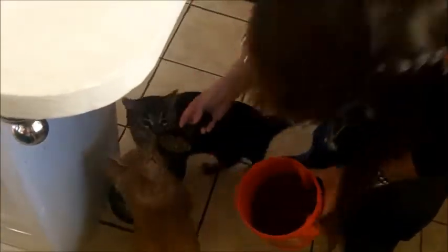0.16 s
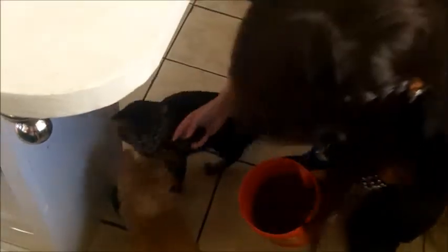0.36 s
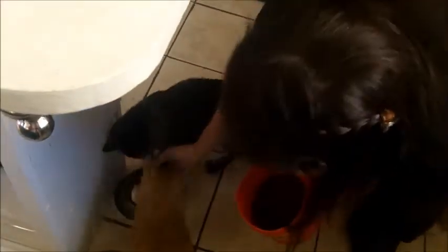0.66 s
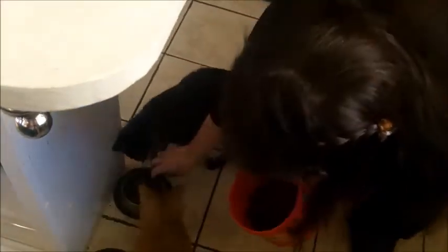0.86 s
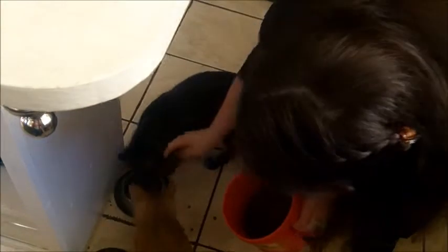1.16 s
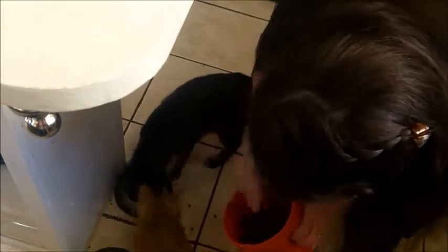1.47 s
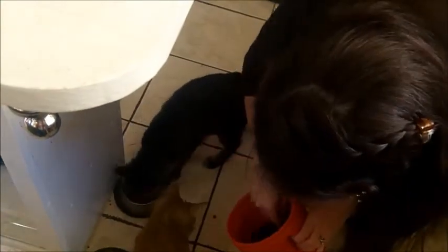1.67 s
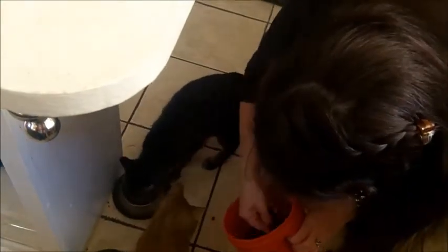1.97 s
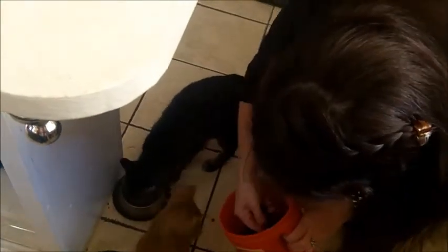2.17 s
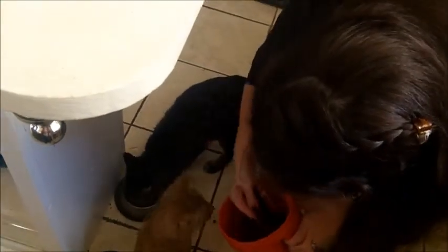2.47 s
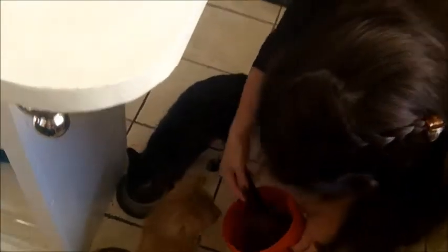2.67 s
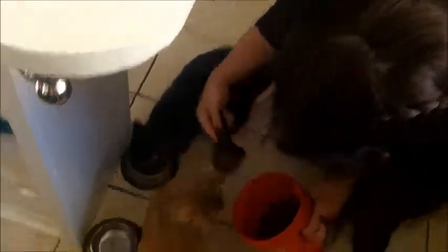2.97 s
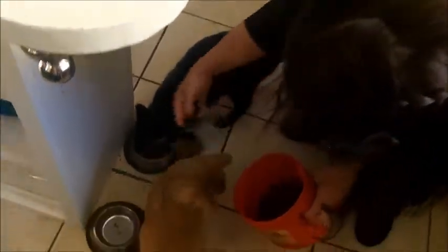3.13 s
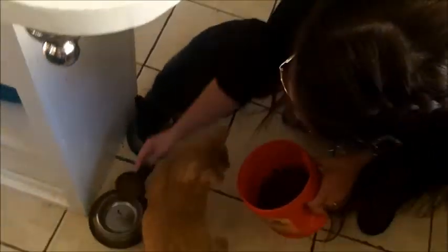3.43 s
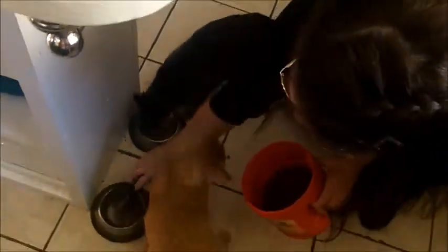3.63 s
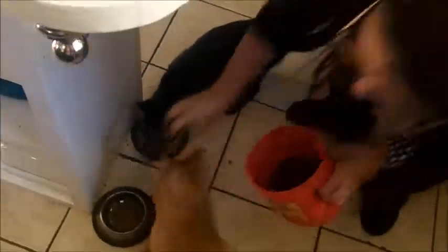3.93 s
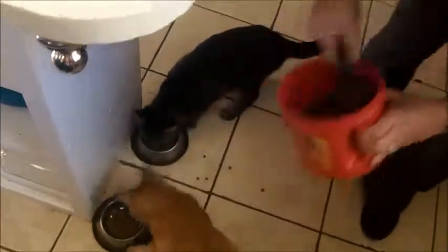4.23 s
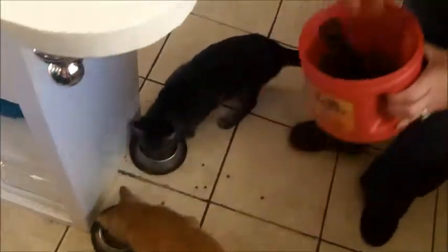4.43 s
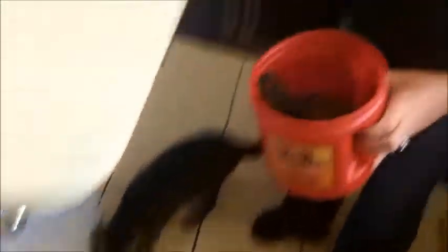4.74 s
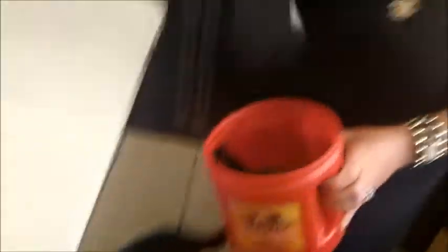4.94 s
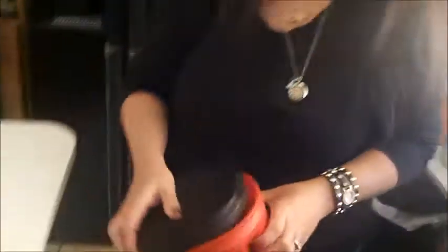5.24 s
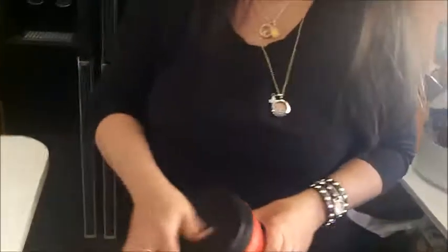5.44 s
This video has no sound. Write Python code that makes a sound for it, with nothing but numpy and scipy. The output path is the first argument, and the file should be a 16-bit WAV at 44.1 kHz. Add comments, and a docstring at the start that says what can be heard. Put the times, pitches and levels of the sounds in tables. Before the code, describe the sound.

Dry cat food clatters into a steel bowl, a plastic scoop digs in a tub, a second bowl is filled, then a lid snaps shut.

```python
"""Dry cat food rattles into a steel bowl, a scoop digs in a plastic tub, and a second scoopful fills another bowl.
The scoop is dropped into the tub, the food slides as the tub is lifted, and the lid snaps on, over a quiet rumble.
Random pellet impacts ring the modes of the bowls and the tub; filtered bursts of noise make the plastic cracks.
Echoes of decaying noise place it all in a tiled kitchen."""
import sys
import numpy as np
from scipy import signal
from scipy.fft import rfft, irfft
from scipy.io import wavfile

SR = 44100
rng = np.random.default_rng(int(sys.argv[2]) if len(sys.argv) > 2 else 0)


def waveform_to_disk(signal):
    """Save audio, clipped to [-1, 1], as 16-bit WAV at the path in sys.argv[1]."""
    frames = np.transpose(np.atleast_2d(signal))
    scaled = np.clip(frames, -1, 1) * 32767
    samples = np.round(scaled).astype(np.int16)
    wavfile.write(sys.argv[1], SR, samples)


N = 246959
TIME = np.arange(N) / SR

# colour of food pellets crunching together: (frequency [Hz], relative level [dB])
CRUNCH_COLOUR = [(150, -46.5), (400, -4.5), (800, -1), (1400, 3.5), (2000, 3), (2700, 5.5), (3800, -0.5),
                 (5200, -6), (7000, -12.5), (7900, -107), (9700, -24), (14000, -93)]
# modes of the plastic tub: (frequency [Hz], relative level [dB], undamped time to fall 60 dB [s])
TUB_MODES = [(258, -35, 0.15), (419, 11.5, 0.028), (471, 24, 0.021), (587, 20, 0.024), (774, 2.5, 0.29),
             (1030, -47, 0.027), (1371, 10, 0.04)]
# modes of the plastic lid: (frequency [Hz], relative level [dB], time to fall 60 dB [s])
LID_MODES = [(225, -27, .05), (430, 14, 0.023), (580, -34, .06), (750, 13, 0.014), (920, -1, 0.032),
             (1140, 1, 0.028), (1950, -2, 0.013), (2900, 5.5, 0.037)]


def undb(db):
    """Turn decibels into a gain."""
    return 10 ** (np.asarray(db) / 20)


def unit(x):
    """Scale a sound to an energy of one."""
    return x / np.sqrt(np.sum(x ** 2) + 1e-18)


def fade(t60, size=6000):
    """Die away exponentially, by 60 dB in t60 seconds."""
    return np.exp(-np.log(1000) * TIME[:size] / max(t60, 1e-4))


def mode(hz, t60, size=6000):
    """One way an object can vibrate: a single decaying sine."""
    return np.sin(2 * np.pi * hz * TIME[:size]) * fade(t60, size)


def through(x, response):
    """Pass a sound through an impulse response."""
    return signal.fftconvolve(x, response)[:len(x)]


def high_pass(x, hz, order=2):
    """Remove the bass, since small objects radiate little of it."""
    return signal.sosfilt(signal.butter(order, hz, "high", fs=SR, output="sos"), x)


def low_pass(x, hz, order=4):
    """Remove the treble, since a soft contact gives little of it."""
    return signal.sosfilt(signal.butter(order, hz, fs=SR, output="sos"), x)


def colour(points, size=4096):
    """Make an impulse response of unit energy, with no pre-echo, from (frequency [Hz], level [dB]) points."""
    hz, db = np.transpose(points)
    bins = np.maximum(np.fft.rfftfreq(size, 1 / SR), 1)
    log_gain = np.log(undb(np.interp(np.log(bins), np.log(hz), db)))
    # folding the cepstrum gives minimum phase: the energy comes as early as it can
    cepstrum = irfft(log_gain)
    cepstrum[1:size // 2] *= 2
    cepstrum[size // 2 + 1:] = 0
    return unit(irfft(np.exp(rfft(cepstrum))))


def add(track, s, sound, db):
    """Place a hit on the track at s seconds with the given peak level."""
    start = int(s * SR)
    scaled = sound * undb(db) / np.abs(sound).max()
    track[start:start + len(sound)] += scaled[:N - start]


def wander(per_s):
    """Drift at random between per_s new values a second, with a spread near one."""
    knots = np.arange(0, TIME[-1] + 1, 1 / per_s)
    return np.interp(TIME, knots, rng.standard_normal(len(knots)))


def surges(rows, attack_s, fall_db_per_s):
    """Pellets get going, keep moving, then settle: one gain curve per level column, overlaps adding in power."""
    power = 0
    for s, hold, *levels in rows:
        age = TIME - s
        rise = np.clip(age / attack_s, 0, 1)
        fall = undb(-fall_db_per_s * np.clip(age - hold, 0, 1))
        power = power + np.outer(undb(levels), rise * fall) ** 2
    return np.sqrt(power)


def impacts(per_s, spread_db):
    """Pellets hit at random moments with uneven force; the mean power is one."""
    force = undb(spread_db * np.minimum(rng.standard_normal(N), 2))
    happens = rng.random(N) < per_s / SR
    return unit(force * happens) * np.sqrt(N)


def strike(hits, response):
    """Each impact lands somewhere else, so it excites a resonance with its own strength and sign."""
    return through(hits * rng.uniform(-0.97, 1, N) * np.sqrt(3), response)


def rattle(hits, spectrum, t60, count=18):
    """Every pellet clicks with its own mix of very short rings; the colour shifts as the heap rearranges."""
    clicks = 0
    for hz in np.geomspace(400, 13000, count):
        shifting = hits * undb(3.5 * wander(45))
        ring = unit(mode(hz, t60 * np.sqrt(1000 / hz)))  # t60 holds at 1 kHz, higher rings are shorter
        clicks = clicks + np.sqrt(hz) * strike(shifting, ring)
    return unit(through(clicks, colour(spectrum))) * np.sqrt(N)


def crack(hz, t60, low_db, high_db):
    """A burst of tiny slips: decaying noise shaped around one pitch, with little treble far above it."""
    skirt = [(100, low_db - 25.5), (hz / 2, low_db), (hz, 0), (hz * 1.5, -6)]
    treble = [(max(6500, hz * 1.6), high_db), (8000, -60), (15000, -52)]
    envelope = fade(t60)
    return through(rng.standard_normal(len(envelope)) * envelope, colour(skirt + treble))


def ringing(modes, damping=1):
    """One tap on a plastic body sets all its modes ringing; damping shortens them."""
    tap = sum(undb(db) * mode(hz, t60 / damping) for hz, db, t60 in modes)
    return low_pass(high_pass(tap, 152), 3000)


def pour(gushes, bowl, per_s, spread_db, fill_s, damping, detune, steel_db, bare_db, bright_db, clatter_db):
    """Pellets hit the steel and each other; as food covers the bottom the modes shift and ring softer and shorter."""
    # colour of pellets clattering: (frequency [Hz], relative level [dB])
    clatter_colour = [(150, -39), (400, 0), (800, 0.5), (1600, 3.5), (2800, 10), (4200, 1.5), (6800, -4),
                      (8000, -10), (12500, -33), (14000, -55)]
    attack_s, bright_hz = 0.0036, 3930
    flow, = surges(gushes, attack_s, fall_db_per_s=165)
    start = gushes[0][0]
    hits = impacts(per_s, spread_db)
    hits[int((start + attack_s) * SR)] = 2 * np.sqrt(SR / per_s)  # the front of the scoopful lands together

    bare = np.exp(-np.maximum(TIME - start, 0) / fill_s)  # share of the impacts that meet bare steel
    loudness = undb(bare_db * bare)
    sizes = unit(undb([level for _, level, _ in bowl]))
    steel = 0
    for size, (hz, _, t60) in zip(sizes, bowl):
        drive = hits * flow * loudness * undb(2 * wander(24.43))  # the stream moves over the nodes of this mode
        clear = strike(drive * np.sqrt(bare), unit(mode(hz, t60)))
        covered_mode = unit(mode(hz * (1 + detune), t60 / damping))
        muffled = strike(drive * np.sqrt((1 - bare) / damping), covered_mode)
        # hard pellets favour the high modes: bright_db is in dB per octave
        hardness = undb(bright_db * max(np.log2(hz / bright_hz), 0))
        steel = steel + size * hardness * (clear + muffled)
    clatter = flow * rattle(hits, clatter_colour, 0.0056)
    return undb(steel_db) * high_pass(steel, 400) + undb(clatter_db) * clatter


def fill_two_bowls():
    """Two scoopfuls ring two steel bowls, each with its own modes and its own speed of being covered."""
    # modes of each bare bowl: (frequency [Hz], relative level [dB], time to fall 60 dB [s])
    first_bowl = [(501, -16, .08), (770, -12, .07), (1040, -3, .1), (1500, -7, .07), (1597, -6, .08),
                  (1826, 0, .16), (1965, -6, .1), (2200, -5, .1), (2595, 0, .1), (2905, 0, .09),
                  (3080, -5, .08), (3920, -10, .05), (4080, -3, .07), (5116, -8, .16), (5245, -14, .1),
                  (6390, -12, .1), (6590, -12, .1), (9450, -19, .03), (10290, -25, .07), (11350, -21, .03),
                  (12650, -21, .02)]
    second_bowl = [(518, -5, .08), (615, -7, .1), (1443, 0.5, .13), (2103, -3, .14), (2414, -6, .09),
                   (2768, 0, .12), (3230, -5, .11), (4090, -1, .1), (5367, -13, .09), (5516, -9, .12),
                   (6835, -9, .09), (8280, -23, .06), (9735, -21, .05), (10040, -22, .09),
                   (11300, -19, .05), (12700, -25, .03)]
    # gushes of pellets leaving the scoop, one list per bowl: (time [s], time from start to fall [s], relative level [dB])
    first_gushes, second_gushes = [
        [(0.793, 0.24, -25.5), (0.82, 0.012, -22), (0.98, 0.02, -27)],
        [(3.657, 0.0053, -24), (3.691, 0.016, -21.5), (3.755, 0.074, -22.5)],
    ]
    first = pour(first_gushes, first_bowl, per_s=2200, spread_db=3.0, fill_s=0.11, damping=3.1,
                 detune=0.0058, steel_db=1.44, bare_db=2.5, bright_db=1, clatter_db=-4.5)
    second = pour(second_gushes, second_bowl, per_s=2200, spread_db=2.5, fill_s=0.055, damping=4.6,
                  detune=0.012, steel_db=0.36, bare_db=11.0, bright_db=0.5, clatter_db=-7.5)
    return first + second


def pings():
    """A lone late pellet rings one low mode of the first steel bowl."""
    # late pellets: (time [s], peak level [dB])
    late_pellets = [(1.125, -28), (1.254, -36)]
    out = np.zeros(N)
    for s, db in late_pellets:
        add(out, s, mode(1026, t60=0.038), db)
    return out


def stir(per_s, spread_db, crunch_db, boom_db):
    """Pellets grind past each other and drum on the tub; once the lid is on, the lid rings instead."""
    # pushes that set the food moving:
    # (time [s], time from start to fall [s], relative crunch level [dB], relative boom level of the wall [dB])
    pushes = [(1.585, 0.028, -26.5, -57), (1.672, 0.37, -29.5, -31), (1.716, 0.011, -21.5, -35),
              (1.762, 0.0083, -26.5, -38), (1.872, 0.029, -37, -34), (2.06, 0.028, -27.5, -32),
              (2.08, 0.028, -22.5, -30.5), (2.2, 0.16, -39.5, -40.5), (2.435, 0.16, -39.5, -46),
              (4.358, 0.052, -40, -37.5), (4.485, 0.092, -38.5, -38), (4.62, 0.12, -44, -45),
              (4.75, 0.11, -39, -39.5), (4.845, 0.012, -38.5, -31.5), (5.02, 0.12, -46.5, -57),
              (5.2, 0.03, -34.5, -23.5), (5.302, 0.015, -34.5, -33), (5.43, 0.038, -37.5, -59),
              (5.52, 0.09, -47.5, -72)]
    lid_on_s = 5.19
    crunch, boom = surges(pushes, attack_s=0.011, fall_db_per_s=219)
    hits = impacts(per_s, spread_db)
    # the high-pass weakens the lowest mode of the tub, which the food damps
    tub, lid = (unit(high_pass(ringing(modes), 304, order=4)) for modes in (TUB_MODES, LID_MODES))
    closed = TIME >= lid_on_s
    walls = strike(hits * boom * ~closed, tub) + strike(hits * boom * closed, lid)
    return undb(crunch_db) * crunch * rattle(hits, CRUNCH_COLOUR, 0.0083) + undb(boom_db) * walls


def knocks(blows, modes, t60, low_db, high_db):
    """Hard plastic cracks at the contact and the body rings."""
    out = np.zeros(N)
    for s, crack_db, crack_hz, body_db in blows:
        add(out, s, crack(crack_hz, t60, low_db, high_db), crack_db)
        add(out, s, ringing(modes), body_db)
    return out


def scoop_knocks():
    """The scoop knocks in the tub, and each contact rings the tub."""
    # blows: (time [s], crack peak level [dB], crack pitch [Hz], body peak level [dB])
    scoop_blows = [(1.5947, -16.5, 2330, -37), (1.7273, -10.5, 3000, -13.5), (1.7696, -11.5, 1640, -13),
                   (1.8871, -8.5, 2530, -30), (2.1269, -14.5, 3270, -23), (2.2201, -19, 2090, -30),
                   (2.4029, -20.5, 1390, -51), (2.4377, -19.5, 1130, -44), (2.4998, -25, 1470, -37),
                   (2.5893, -25, 2650, -27), (3.0846, -25.5, 850, -30), (4.3582, -20, 1330, -24),
                   (4.373, -20, 1250, -38), (4.388, -12.5, 1070, -16.5), (4.396, -12, 1310, -34),
                   (4.4522, -8.5, 2570, -21), (4.5089, -15.5, 1410, -41), (4.578, -16.5, 940, -22),
                   (4.6349, -24, 1950, -47), (4.855, -18.5, 1620, -24.5), (4.8704, -24, 1430, -23.5)]
    return knocks(scoop_blows, TUB_MODES, t60=0.041, low_db=-15.5, high_db=-25.5)


def landing(damping, bottom_hz, bottom_t60, bottom_db, contact_hz):
    """The dropped scoop drives the bottom of the tub; the food on it softens the blow and chokes the ring."""
    # the scoop landing and chattering: (time [s], thump peak level [dB], crack peak level [dB]), before the high-pass
    contacts = [(4.4695, -1, -9), (4.4737, -3, -18), (4.4779, -10, -13)]
    lead_s = 0.00095  # the bottom starts to give just before the hard contact
    out = np.zeros(N)
    bottom = undb(bottom_db) * mode(bottom_hz, bottom_t60)
    thump = low_pass(ringing(TUB_MODES, damping) + bottom, contact_hz)
    for s, thump_db, crack_db in contacts:
        add(out, s - lead_s, thump, thump_db)
        add(out, s, crack(2600, 0.042, low_db=3, high_db=-15), crack_db)
    return high_pass(out, 81)


def lid_claps():
    """The lid claps onto the rim and is pressed down, and each contact rings the lid."""
    # blows: (time [s], crack peak level [dB], crack pitch [Hz], body peak level [dB])
    lid_blows = [(5.2005, -11, 2430, -10.5), (5.235, -21, 1500, -25), (5.2652, -19.5, 2400, -23),
                 (5.309, -22, 3650, -38), (5.3162, -12.5, 2760, -21.5), (5.3247, -24, 2940, -16.5),
                 (5.463, -17, 3300, -24.5)]
    return knocks(lid_blows, LID_MODES, t60=0.038, low_db=-0.5, high_db=-28)


def snaps():
    """The rim of the lid jumps over its bead: a few sharp cycles with a bright edge."""
    # the rim snapping home: (time [s], peak level [dB], pitch [Hz], time to fall 60 dB [s])
    rim_jumps = [(5.2892, -3.5, 2950, .0036)]
    out = np.zeros(N)
    for s, db, hz, t60 in rim_jumps:
        body = mode(hz, t60) * (1 - fade(0.0007))
        edge = 0.6 * mode(1.5 * hz, t60 / 3)
        add(out, s, body + edge, db)
    return out


def scrapes(per_s):
    """Plastic sticks and slips against the food; each stroke starts quickly and rings one resonance."""
    # strokes of scoop and food over plastic: (time [s], length [s], level [dB], pitch [Hz])
    strokes = [(1.587, 0.028, -26.5, 402), (1.67, 0.12, -29, 1470), (1.832, 0.037, -29, 2640),
               (1.99, 0.051, -25.5, 1150), (2.427, 0.049, -31.5, 1020), (3.076, 0.04, -33.5, 720),
               (4.744, 0.14, -35.5, 1680), (4.855, 0.021, -25, 477), (5.307, 0.041, -29, 910)]
    sharpness = 4.3  # pitch of a scrape over its bandwidth
    out = np.zeros(N)
    for s, length, db, hz in strokes:
        progress = np.clip((TIME - s) / length, 0, 1)
        slips = impacts(per_s, 1.0) * np.sin(np.pi * np.sqrt(progress))
        t60 = np.log(1000) * sharpness / (np.pi * hz)
        resonance = high_pass(mode(hz, t60), hz / 2)
        out += undb(db) * np.sqrt(length * SR / 2) * unit(through(slips, resonance))
    return out


def bumps():
    """The tub is nudged and its walls flex with a soft, low thud."""
    # dull bumps of the handled tub: (time [s], peak level [dB], pitch [Hz])
    nudges = [(2.331, -32.5, 192), (2.363, -33, 144), (2.405, -32, 215), (2.44, -29, 159),
              (2.97, -33.5, 146), (3.092, -36.5, 147), (4.44, -22.5, 240), (4.496, -21.5, 251),
              (4.724, -36.5, 109), (5.203, -37, 200), (5.435, -24, 240), (5.464, -29, 181)]
    out = np.zeros(N)
    for s, db, hz in nudges:
        add(out, s, mode(hz, 0.044) * (1 - fade(0.016)), db)
    return out


def carry():
    """A few pellets roll about in the carried scoop at each jolt."""
    # jolts: (time [s], time from start to fall [s], level [dB])
    jolts = [(0.055, 0.015, -55), (0.685, 0.023, -44.5), (0.73, 0.14, -46), (2.807, 0.044, -44),
             (2.86, 0.025, -54), (3.04, 0.091, -44), (3.314, 0.014, -38.5), (3.432, 0.2, -50.5),
             (3.58, 0.1, -47)]
    rolling, = surges(jolts, attack_s=0.015, fall_db_per_s=213)
    hits = impacts(per_s=1400, spread_db=3)
    return rolling * rattle(hits, CRUNCH_COLOUR, 0.0082)


def ticks():
    """Single pellets drop and skip, each a small crack; the loud one at 3.691 s is a clump of the second
    scoopful striking."""
    # stray pellets and small ticks, and at 3.691 s a clump of the second scoopful striking: (time [s], peak
    # level [dB], pitch [Hz])
    small_hits = [(0.067, -33, 3070), (0.144, -39, 3120), (0.26, -38.5, 2910), (1.253, -36.5, 2000),
                  (2.352, -30.5, 2900), (2.452, -25, 3230), (2.699, -30, 1470), (2.726, -36.5, 1530),
                  (2.817, -27, 2280), (2.964, -32, 1020), (3.334, -31.5, 1020), (3.436, -34, 2460),
                  (3.691, -12, 2740), (4.061, -35.5, 1860)]
    out = np.zeros(N)
    for s, db, hz in small_hits:
        add(out, s, crack(hz, 0.048, low_db=-11.5, high_db=-17), db)
    return out


def kitchen(x, wet_db, t60, treble_t60, size=30000):
    """Tiles and cupboards return a dense tail of echoes, whose treble dies at its own rate."""
    noise = rng.standard_normal(size)
    low = low_pass(noise, 2500, order=2)
    decaying = low * fade(t60, size) + (noise - low) * fade(treble_t60, size)
    tail = decaying * (1 - fade(0.017, size))  # the echoes build up gradually
    return x + undb(wet_db) * through(x, unit(tail))


def air():
    """The quiet of the kitchen: steady, faintly rumbling noise."""
    # colour of the quiet: (frequency [Hz], relative level per Hz [dB])
    quiet_colour = [(12, -44), (20, -2.5), (63, -2), (83, -22), (109, -6.5), (171, -11.5), (342, -9),
                    (565, -16), (1200, -18.5), (1380, -22), (1820, -21), (1980, -20.5), (7950, -33.5),
                    (8880, -34), (15500, -35.5)]
    level_db = -47.5
    return undb(level_db) * through(rng.standard_normal(N), colour(quiet_colour, size=16384))


def scene():
    """Mix bowls, food, plastic and thump, each group with its own strength and length of echo, over the air."""
    bowls = kitchen(fill_two_bowls() + pings(), wet_db=-11.5, t60=0.48, treble_t60=0.22)
    food = stir(per_s=1000, spread_db=3.5, crunch_db=-0.1, boom_db=-1.1)
    small = carry() + ticks() + scrapes(per_s=1200)
    food_and_small = kitchen(food + small, wet_db=-4.5, t60=0.44, treble_t60=0.46)
    plastic = scoop_knocks() + lid_claps() + bumps() + snaps()
    plastic = kitchen(plastic, wet_db=-10.5, t60=0.35, treble_t60=0.073)
    thump = landing(damping=1.5, bottom_hz=250, bottom_t60=0.013, bottom_db=-9, contact_hz=574)
    thump = kitchen(thump, wet_db=-14.5, t60=0.47, treble_t60=0.25)
    return (bowls + food_and_small + plastic + thump + air())[None]


def record(dry):
    """The recorder clips at full scale, the microphone has a dip in the treble, and the top is cut."""
    notch_hz, notch_q, top_hz = 7900, 4.1, 15400
    clipped = np.clip(dry, -1, 1)
    heard = signal.lfilter(*signal.iirnotch(notch_hz, notch_q, fs=SR), clipped)
    return signal.sosfilt(signal.ellip(8, 0.2, 70, top_hz, fs=SR, output="sos"), heard)


dry = scene()
out = record(dry)
waveform_to_disk(out)
```